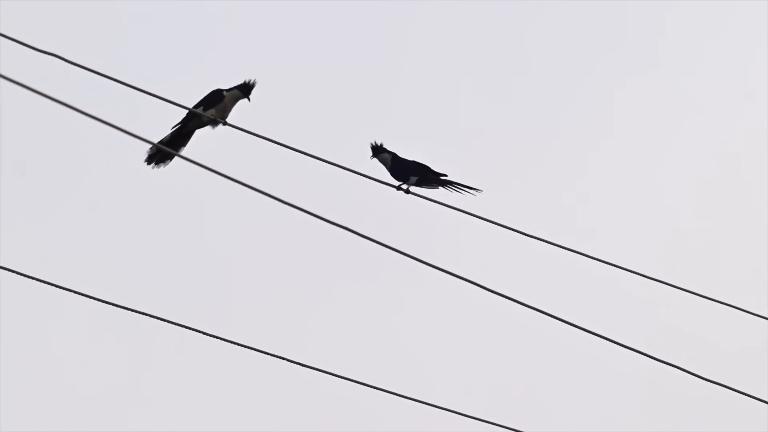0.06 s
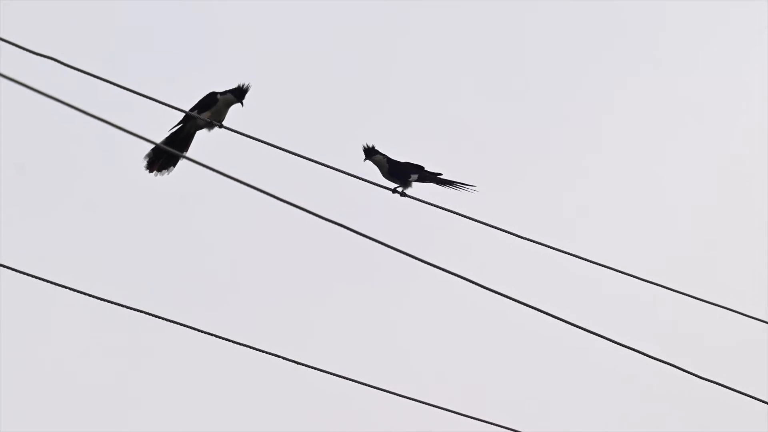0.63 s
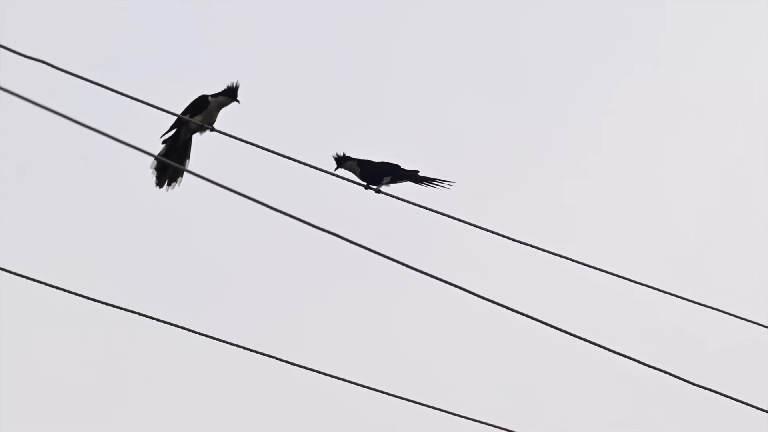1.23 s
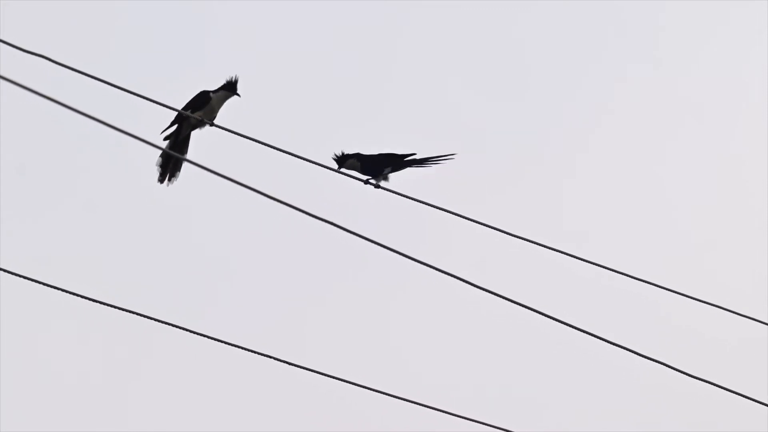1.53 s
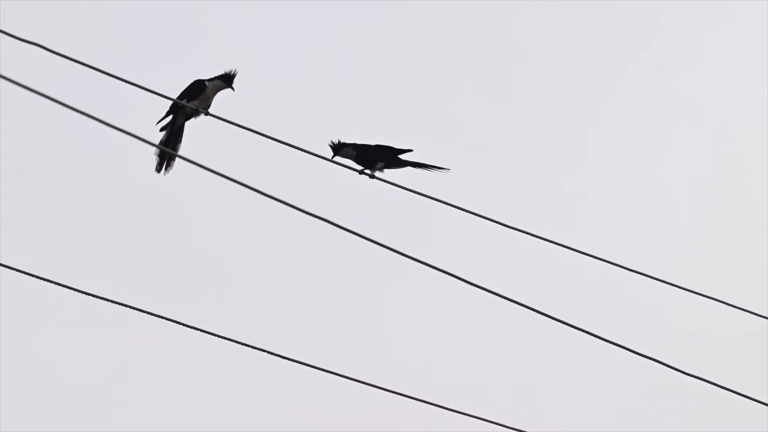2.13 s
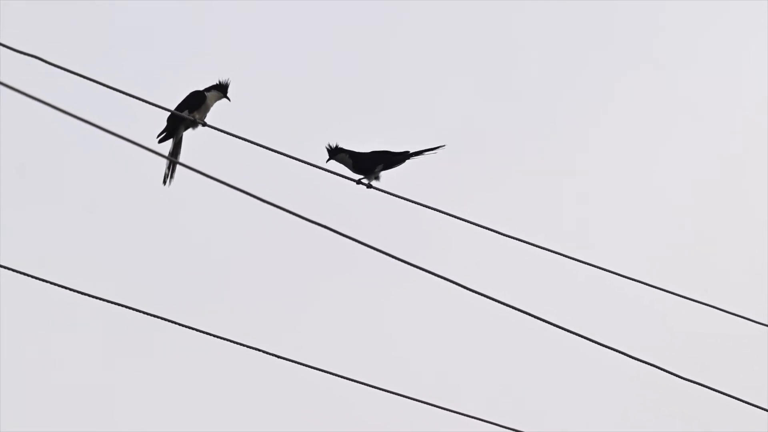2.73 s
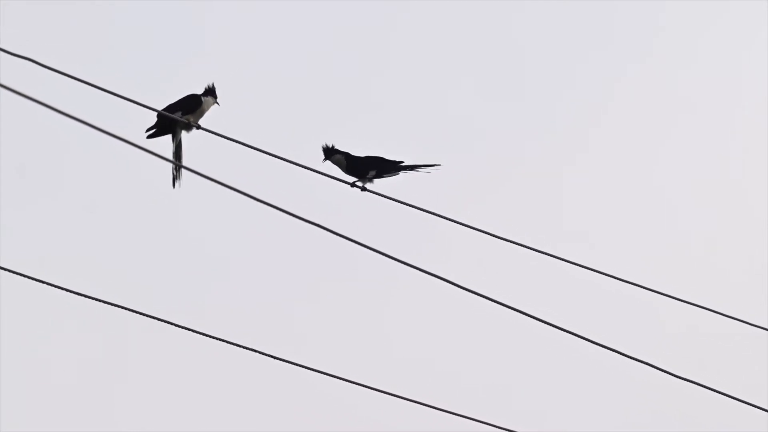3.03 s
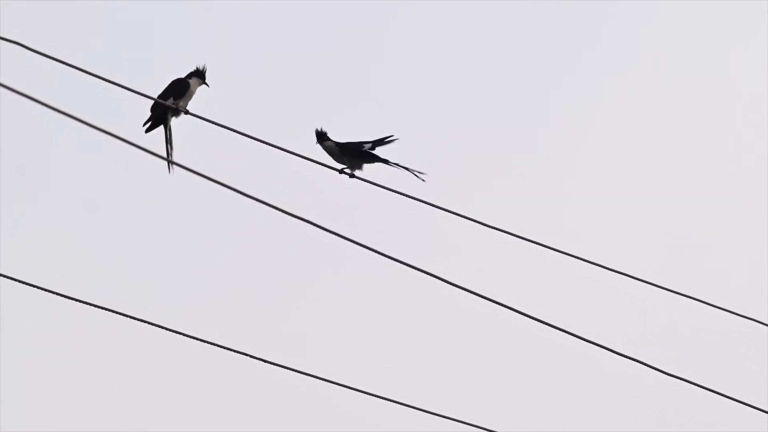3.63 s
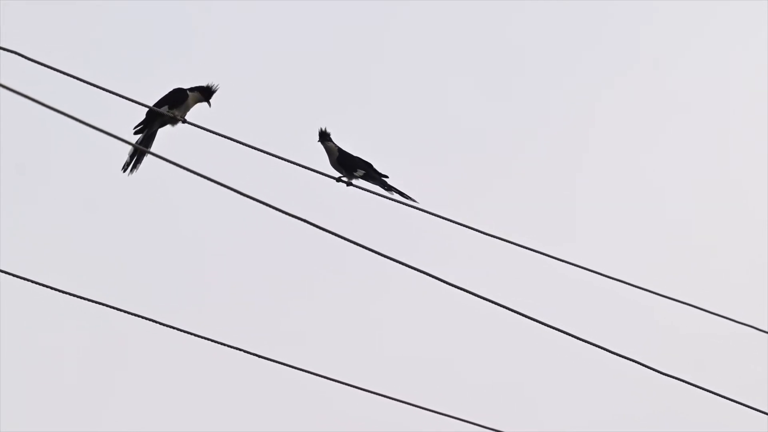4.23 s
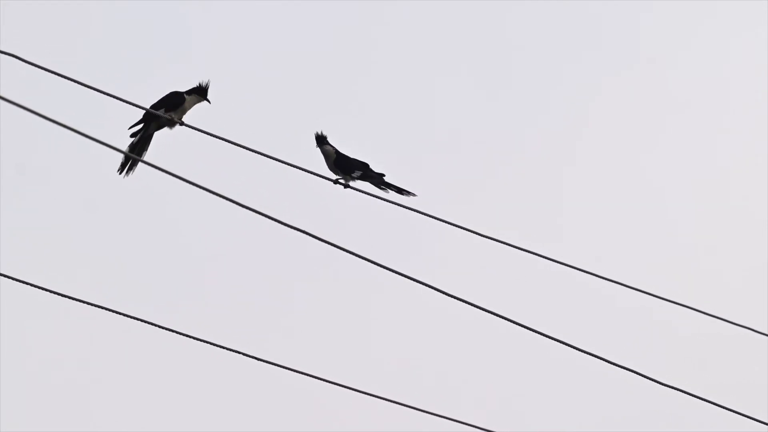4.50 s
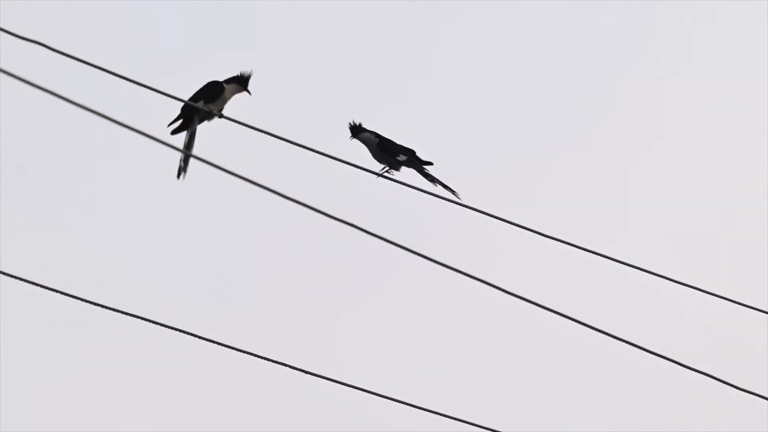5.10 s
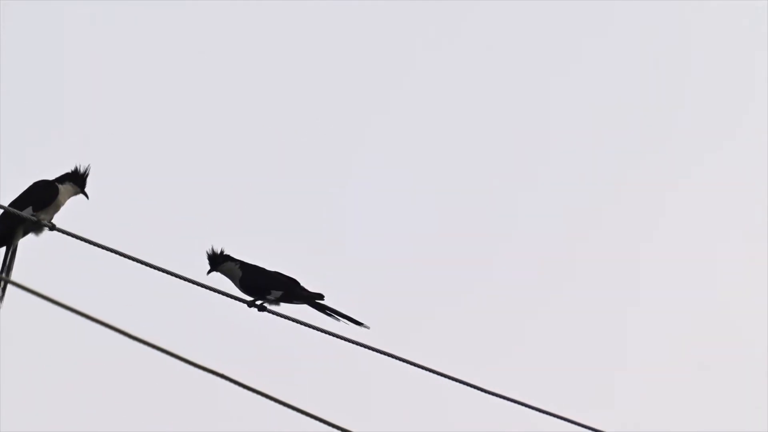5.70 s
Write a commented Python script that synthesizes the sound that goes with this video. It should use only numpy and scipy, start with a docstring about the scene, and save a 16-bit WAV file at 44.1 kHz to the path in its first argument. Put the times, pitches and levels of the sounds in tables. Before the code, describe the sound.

A cuckoo repeats a loud, falling, trilled whistle while a second answers softly, over faint small birds and a distant engine hum.

```python
"""A loud, falling, trilled whistle: a cuckoo on a wire repeats it, and a second answers in soft, wavering notes.
Each voice is a nearly pure tone from the syrinx, pulsed by a fast trill and edged with hoarse overtones.
Small birds chirp, rasp and whistle farther off, and ground and trees scatter all the song a little.
Under it lie the low hum of a distant idling engine and open-air noise.
The whole scene is much stronger in the left channel."""
import sys
import numpy as np
from scipy import signal
from scipy.fft import rfft, irfft, next_fast_len
from scipy.io import wavfile
from scipy.ndimage import map_coordinates

SR = 44100
rng = np.random.default_rng(int(sys.argv[2]) if len(sys.argv) > 2 else 0)


def master(y):
    """Save y as 16-bit WAV."""
    cut = np.clip(np.atleast_2d(y).T, -1, 1)
    pcm = np.round(cut * 32767)  # scale
    wavfile.write(sys.argv[1], SR, pcm.astype(np.int16))


N = 262395
T = np.arange(N) / SR

# colour of the open-air bed: (frequency [Hz], relative density [dB])
AIR_COLOUR = [(20, 4.5), (55, 0.5), (90, -6), (150, -9), (195, -3), (240, -9.5), (420, -13.5), (800, -16.5),
              (1150, -16.5), (1500, -25.5), (1900, -30), (2300, -31.5), (3600, -34), (7000, -46),
              (15000, -62)]
# the engine's sub-bass partials: (frequency [Hz], level [dB])
ENGINE_THROB = [(14.2, -44), (21.28, -31), (28.36, -56), (37, -52), (42.56, -53)]
# the engine's hum tones: (frequency [Hz], level [dB])
ENGINE_HUM = [(129.2, -65.5), (333.8, -68), (667.5, -71)]
# decay of the scatter from ground and trees: (frequency [Hz], time to fall 60 dB [s])
TREE_DECAY = [(500, 0.25), (2000, 0.193), (10000, 0.0555)]
# hoarse calls of the small birds: (time [s], length [s], centre [Hz], level [dB])
RASP_CALLS = [(0.389, 0.075, 3010, -70), (1.376, 0.0567, 2645, -65), (2.562, 0.132, 3070, -77),
              (4.403, 0.0784, 2590, -70)]
# colour of a rasp: (frequency over its centre [ratio], relative level [dB])
RASP_BAND = [(.55, -40.5), (.8, -12), (1, 1.5), (1.4, -11), (1.9, -77)]
# syllables of a small bird's chirps: (time [s], length [s], pitch [Hz], level [dB])
CHIRP_SYLLABLES = [(3.450, 0.0122, 1477, -63), (3.47, 0.0142, 1510, -62), (3.496, 0.0106, 1458, -68.5),
                   (4.139, .012, 1516, -59.5), (4.162, 0.012, 1604, -58), (4.178, 0.0111, 1504, -63.5),
                   (4.783, 0.0125, 1595, -58.5), (4.801, 0.026, 1640, -59), (4.878, 0.014, 1685, -58),
                   (4.896, 0.0209, 1782, -55)]
# colour of a chirp's harmonics: (frequency [Hz], gain [dB])
CHIRP_COLOUR = [(1600, -17), (3000, -1.5), (3600, -4.5), (4600, -1.5), (5300, 1), (5900, -14), (6600, -11),
                (7200, -14), (8000, -34)]
# faint distant hoots: (time [s], length [s], pitch [Hz], level [dB])
FAR_HOOTS = [(4.419, 0.1006, 1029, -56), (4.54, 0.066, 832, -61), (4.812, 0.0264, 1123, -54.5)]
# thin rising whistles far away: (time [s], length [s], starting pitch [Hz])
FAR_WHISTLES = [(.155, 0.059, 4480), (0.351, 0.076, 4390), (0.559, 0.054, 4500), (0.647, 0.049, 4890),
                (0.919, 0.038, 4600), (0.992, 0.067, 4204), (1.213, 0.065, 4200), (1.45, 0.051, 4380)]
# the cuckoos' overtones at full drive: (frequency [Hz], level against the fundamental [dB])
CUCKOO_COLOUR = [(2800, -30), (3450, -24), (4400, -31), (5400, -44), (6500, -36), (7450, -20), (8000, -26),
                 (8600, -28), (9700, -50), (10700, -36), (11350, -24), (12300, -40), (14400, -32),
                 (15400, -28)]
# soft answers: (time [s], length [s], pitch [Hz], level [dB], opening accent [dB], waver [share of pitch])
SOFT_ANSWERS = [(.304, .113, 1617, -55.5, 5, 0.0156), (.416, 0.121, 1555, -59, 11.5, 0.055),
                (0.689, 0.0537, 1798, -59, 0.5, 0.054), (1.121, 0.135, 1590, -58.5, 12, 0.0404),
                (1.782, 0.122, 1519, -58.5, 11, 0.059), (2.502, 0.0493, 1740, -55.5, -2.5, 0.063),
                (2.543, 0.1186, 1519, -58.5, 4, 0.0505), (3.269, 0.1256, 1490, -57.5, 8, 0.0488),
                (3.37, .06, 1827, -59, 2.5, 0.0367), (3.977, 0.116, 1573, -60.5, 7.5, 0.0675),
                (4.260, 0.042, 1774, -58, 2.5, 0.039), (4.708, 0.1306, 1510, -58, 8, 0.0585),
                (5.382, 0.112, 1556, -57.5, 4, 0.0463)]
# loud calls: (time [s], pitch [Hz], level at the top of the swell [dB], opening accent [dB])
LOUD_CALLS = [(.028, 1806, -48.5, 11.5), (.788, 1767, -48.5, 12.5), (1.519, 1818, -47, 10),
              (2.284, 1835, -47, 7), (3.033, 1800, -46.5, 9), (3.763, 1830, -47, 10.5),
              (4.477, 1789, -49, 11.5), (5.192, 1799, -48.5, 10.5), (5.894, 1815, -47.5, 10.5)]


def amp(db):
    """Decibels to gain."""
    return 10 ** (np.asarray(db) / 20)


def unit(x):
    """Scale to rms 1."""
    return x / np.sqrt(np.mean(x ** 2) + 1e-20)


def along(points, hz):
    """Read a curve of (frequency [Hz], value) points on a log axis."""
    knots_hz, values = np.transpose(points)
    return np.interp(np.log(hz + 1), np.log(knots_hz + 1), values)


def wobble(rate, size=N):
    """A smooth random curve, rate knots a second."""
    return map_coordinates(rng.standard_normal(4096), [np.arange(size) * rate / SR], mode="wrap")


def filtered(x, response):
    """Shape a sound with a gain that depends on frequency."""
    size = next_fast_len(N + SR // 2)
    return irfft(rfft(x, size) * response(np.fft.rfftfreq(size, 1 / SR)), size)[..., :N]


def add(track, s, sound):
    """Mix a sound into a track at time s."""
    part = track[max(round(s * SR), 0):][:len(sound)]
    part += sound[:len(part)]


def clock(length):
    """The time of each sample of a note."""
    return np.arange(int(length * SR)) / SR


def bell(t, width):
    """1 at time zero, falling smoothly away over the width."""
    return np.exp(-(t / width) ** 2)


def ramp(t, start, length):
    """0 until start, then rising straight to 1 over the length."""
    return np.clip((t - start) / length, 0, 1)


def phase_of(hz):
    """The running phase of a gliding pitch."""
    return 2 * np.pi * np.cumsum(hz) / SR


def air(db=-50.5, drift_db=0.9541):
    """A bed of dull outdoor noise that drifts a little in level."""
    noise = unit(filtered(rng.standard_normal(N), lambda hz: amp(along(AIR_COLOUR, hz))))
    return noise * amp(db + drift_db * wobble(3.174))


def engine(drift_rad=0.1, waver_db=2.0):
    """A far engine idles: steady sub-bass throb under hum tones that waver with distance."""
    throb = sum(amp(db) * np.sin(2 * np.pi * (hz * T + rng.random())) for hz, db in ENGINE_THROB)
    hum = sum(amp(db + waver_db * wobble(4.01)) * np.sin(2 * np.pi * hz * T + drift_rad * wobble(8))
              for hz, db in ENGINE_HUM)
    return np.sqrt(2) * (throb + hum)


def tree_echoes(x, predelay_s=0.0042):
    """Scatter from ground and trees: a short tail whose treble dies first."""
    hz, t, spectrum = signal.stft(rng.standard_normal(SR // 2), SR, nperseg=256)
    decay = amp(-60 * t / along(TREE_DECAY, hz)[:, None])
    tail = signal.istft(spectrum * decay, SR, nperseg=256)[1]
    delayed = np.pad(x, (int(predelay_s * SR), 0))
    return signal.fftconvolve(delayed, tail / np.linalg.norm(tail))[:N]


def far_chatter(count=48, centre_hz=3100, faintest_db=-80, spread_db=10.3):
    """Many far birds: short, thin notes that slide up or down at random moments."""
    out = np.zeros(N)
    for when, length, pitch, slide, strength in rng.random((count, 5)):
        sweep = np.linspace(-1, 1, int((0.0299 + 0.0417 * length) * SR))
        octaves = .6 * (pitch - .5) + 0.2823 * (slide - .5) * sweep
        gain = amp(faintest_db + spread_db * strength) * (1 - sweep ** 2)
        add(out, when * N / SR, gain * np.sin(phase_of(centre_hz * 2 ** octaves)))
    return out


def rasps(flutter_db=4):
    """A small bird's voice breaks into fluttering noise, alone or on its clear syllables."""
    out = np.zeros(N)
    # each chirp syllable carries a brief, softer rasp above its pitch
    on_chirps = [(s, .03, 1.774 * hz, db - 6.5) for s, _, hz, db in CHIRP_SYLLABLES]
    for s, length, centre_hz, db in RASP_CALLS + on_chirps:
        n = int(length * SR)
        colour = amp(np.interp(np.fft.rfftfreq(n, 1 / SR) / centre_hz, *np.transpose(RASP_BAND)))
        noise = irfft(rfft(rng.standard_normal(n)) * colour, n)
        flutter = amp(flutter_db * wobble(336.6, n))
        add(out, s, amp(db) * unit(noise * flutter) * signal.windows.tukey(n, .5))
    return out


def syrinx(t, hz, level_db, depth=0, trill_hz=100, bend=.03, dip_db=5, jitter=0.0086, shimmer_db=2.5):
    """A bird's unsteady pitch and gain; depth adds a fast trill whose pulses each slide down in pitch."""
    trill_rate = trill_hz * (1 + .09 * wobble(50, len(t)))
    beat = phase_of(trill_rate) + 2 * np.pi * rng.random()
    hz = hz * (1 + bend * depth * np.sin(beat - np.pi / 4) + jitter * wobble(347.6, len(t)))
    level_db = level_db + shimmer_db * wobble(298.9, len(t))
    pulses = np.clip(1 - depth * (amp(dip_db) - 1) * np.sin(beat), 0, None)
    edge_s = 0.00113
    gate = ramp(t, 0, edge_s) * ramp(t[::-1], 0, edge_s)
    return hz, gate * pulses * amp(level_db)


def arched_note(length, pitch_hz, db, sink=0.2037, sink_db=5):
    """Pitch and gain of a note that rises to a flat top and sinks again."""
    t = clock(length)
    ends = np.abs(2 * t / length - 1) ** 3
    return syrinx(t, pitch_hz * (1 - sink * ends), db - sink_db * ends, jitter=.01)


def small_birds(whistle_db=-79, rise_hz_per_s=14000):
    """Arched chirps rich in overtones, with pure hoots and rising whistles in the distance."""
    out = np.zeros(N)
    for s, *note in CHIRP_SYLLABLES:
        hz, gain = arched_note(*note)
        tone = sum(amp(along(CHIRP_COLOUR, k * hz)) * np.sin(k * phase_of(hz)) for k in range(1, 6))
        add(out, s, gain * tone)
    for s, *note in FAR_HOOTS:
        hz, gain = arched_note(*note)
        add(out, s, gain * np.sin(phase_of(hz)))
    for s, length, start_hz in FAR_WHISTLES:
        t = clock(length)
        hz, gain = syrinx(t, start_hz + rise_hz_per_s * t, whistle_db, jitter=.005)
        add(out, s, gain * np.sin(phase_of(hz)))
    return out


def cuckoo_voice(t, hz, gain, bite_db, full_drive_db, bite_s=.013):
    """A nearly pure whistle; a hard attack and loud pulses throw out weak, slightly hoarse overtones."""
    phase = phase_of(hz)
    ragged = phase + .08 * wobble(700, len(t))
    bite = amp(bite_db) * np.exp(-t / bite_s)
    drive = (gain / amp(full_drive_db)) ** (1 / 4)
    overtones = sum((drive * amp(along(CUCKOO_COLOUR, k * hz)) + bite * np.sqrt(k)) * np.sin(k * ragged)
                    for k in range(2, 9))
    return gain * (np.sin(phase) + overtones)


def answering_cuckoo(waver_turns=1.6, droop=0.1995, droop_db=3, trill_grows_s=0.028):
    """Soft answers and short pips with a fast, wide trill: each flicks down, wavers and droops."""
    out = np.zeros(N)
    for s, length, pitch_hz, db, accent_db, waver in SOFT_ANSWERS:
        t = clock(length)
        flick = 0.2257 * np.exp(-t / 0.001887)
        swing = waver * np.cos(2 * np.pi * waver_turns * t / length)
        ending = ramp(t / length, .8, .2)  # the last fifth of the note
        hz = pitch_hz * (1 + flick + swing - droop * ending)
        level_db = db + accent_db * bell(t - 0.00485, width=0.0154) - droop_db * ending
        depth = ramp(t, 0, trill_grows_s) * (1 - ending)
        hz, gain = syrinx(t, hz, level_db, depth, trill_hz=111.82, bend=0.0752, dip_db=2, jitter=0.0144)
        add(out, s, cuckoo_voice(t, hz, gain, bite_db=-60, full_drive_db=-23))
    return out


def calling_cuckoo(length_s=.178, release_at_s=.137, trill_grows_s=0.081):
    """The lead voice: a sharp attack, a fall, a swelling trill that sags, and a drop as it fades."""
    sag_hz_per_s, drop_hz_per_s = 745, 11000
    swell_db_per_s, release_db_per_s = 63.5, 303
    out, t = np.zeros(N), clock(length_s)
    since_release = t - release_at_s
    leap = .165 * bell(t - .008, width=.029)  # opens above its pitch, crests and falls back
    glide_hz = -sag_hz_per_s * (t - release_at_s / 2) - drop_hz_per_s * np.maximum(since_release, 0)
    swell_db = np.minimum(swell_db_per_s * since_release, -release_db_per_s * since_release)
    depth = ramp(t, 0, trill_grows_s) * (1 - ramp(t, release_at_s, length_s - release_at_s))
    for s, pitch_hz, db, accent_db in LOUD_CALLS:
        hz = pitch_hz * (1 + leap) + glide_hz
        level_db = db + swell_db + accent_db * bell(t, width=0.042)
        hz, gain = syrinx(t, hz, level_db, depth,
                          trill_hz=96.9, bend=0.0634, dip_db=3, jitter=0.0109, shimmer_db=2)
        add(out, s, cuckoo_voice(t, hz, gain, bite_db=-33.5, full_drive_db=-46))
    return out


def mic_housing(x, ring_hz=1790, width_hz=110, ring_db=-3):
    """A narrow resonance at the microphone rings on briefly after each note."""
    def response(hz):
        damping = 1j * hz * width_hz
        return 1 + amp(ring_db) * damping / (ring_hz ** 2 - hz ** 2 + damping)
    return filtered(x, response)


def scene(echo_db=-14.0, left_db=3.6, right_db=-6.5):
    """All sources reach one microphone that feeds the left channel more than the right."""
    birds = calling_cuckoo() + answering_cuckoo() + small_birds() + rasps() + far_chatter()
    mono = birds + amp(echo_db) * tree_echoes(birds) + engine() + air()
    return mic_housing(mono) * amp([[left_db], [right_db]])


def record(dry, hiss_db=-72, top_hz=15760):
    """Faint hiss in each channel, then a steep cut of the highest treble."""
    hiss = amp(hiss_db) * rng.standard_normal((2, N))
    return filtered(dry + hiss, lambda hz: hz < top_hz)


dry = scene()
out = record(dry)
master(out)
```